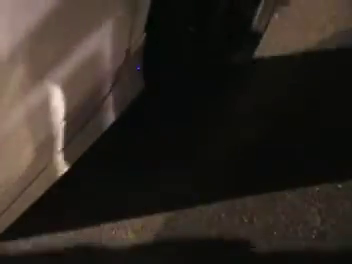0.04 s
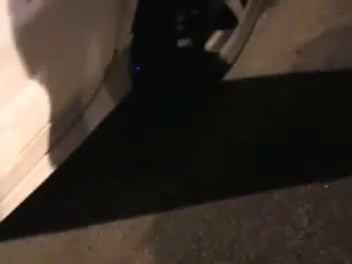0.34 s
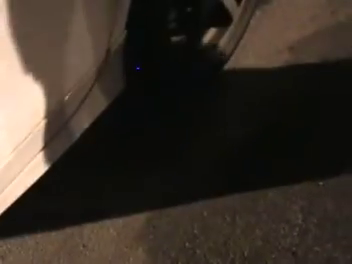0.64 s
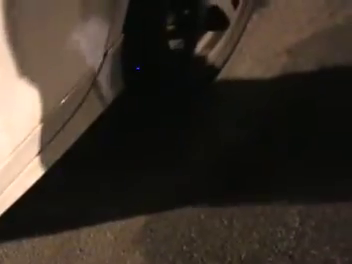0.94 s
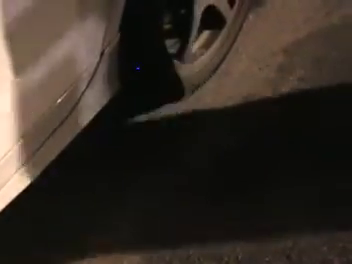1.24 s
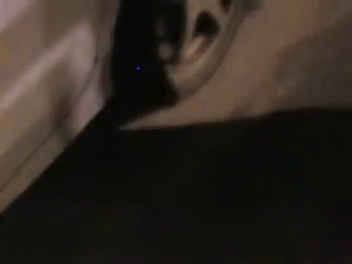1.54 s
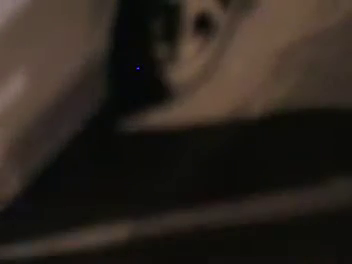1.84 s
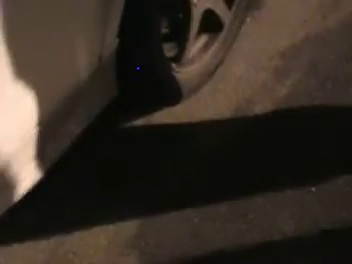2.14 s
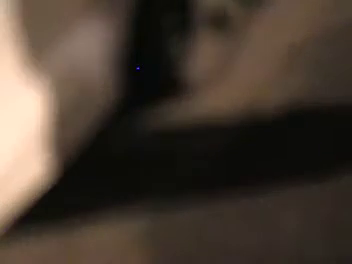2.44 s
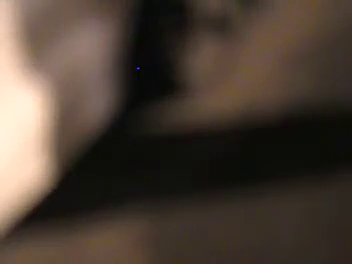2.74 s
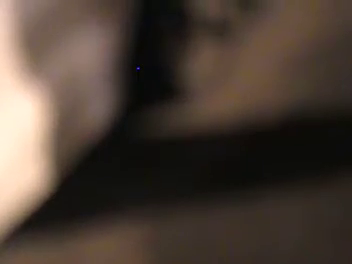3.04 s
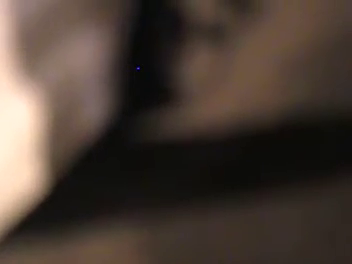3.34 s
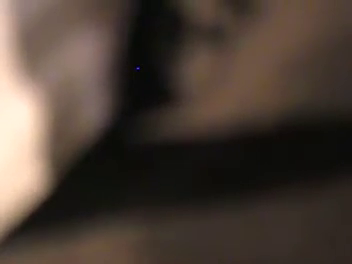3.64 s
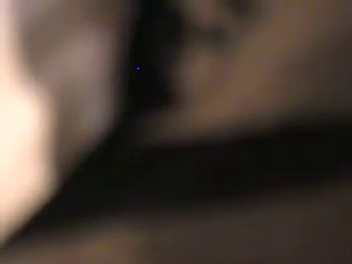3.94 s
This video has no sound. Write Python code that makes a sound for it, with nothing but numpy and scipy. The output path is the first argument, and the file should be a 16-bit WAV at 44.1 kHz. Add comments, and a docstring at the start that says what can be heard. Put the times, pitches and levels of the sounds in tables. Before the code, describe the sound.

A car exhaust drones down in pitch with a few pops and one loud backfire. The engine then revs twice with rushing gas, each climb ending in sharp, stuttering bangs, heard beside the rear wheel on a road.

```python
"""An exhaust drone sinks through the resonances of its pipe, with a few pops and one loud backfire.
It is a four-cylinder car standing on a road at night, the microphone beside the rear wheel.
Twice the throttle opens: the pitch climbs and gas rushes out of the tailpipe. At the rev limit
unburnt fuel explodes in the pipe, in stuttering bangs that overload the microphone."""
import sys
import numpy as np
from scipy import signal
from scipy.fft import rfft, irfft
from scipy.io import wavfile

SR = 44100
rng = np.random.default_rng(int(sys.argv[2]) if len(sys.argv) > 2 else 0)


def master_out(mix):
    """Clip the mix to full scale and print it as 16-bit PCM to the path in sys.argv[1]."""
    frames = np.transpose(np.atleast_2d(mix))
    ceiling = np.clip(frames, -1, 1)
    pcm = np.round(ceiling * 32767).astype(np.int16)
    wavfile.write(sys.argv[1], SR, pcm)


N = 176400
T = np.arange(N) / SR
HZ = np.fft.rfftfreq(N, 1 / SR)

# gas flow under throttle, dropping out whenever the fuel is cut (time [s], level [dB])
GAS_FLOW = [(1.66, -60), (1.73, -29.5), (1.85, -28), (1.95, -19.5), (2.1, -17), (2.25, -16), (2.29, -15.5),
            (2.302, -24.5), (2.355, -14.5), (2.39, -20.5), (2.403, -33), (2.45, -24), (2.5, -29.5),
            (2.56, -58), (3.19, -69), (3.22, -32), (3.25, -18.5), (3.4, -16.5), (3.48, -14.5),
            (3.52, -15.5), (3.545, -25), (3.6, -39), (3.628, -36), (3.638, -13.5), (3.68, -22),
            (3.74, -17.5), (3.78, -25), (3.88, -24.5), (3.92, -18.5), (3.935, -30), (3.953, -34),
            (3.96, -24), (3.99, -17.5)]


def amp(db):
    """Decibels to gain."""
    return 10 ** (np.asarray(db) / 20)


def unit(x):
    """Scales to an rms of one."""
    return x / np.sqrt(np.mean(abs(x) ** 2) + 1e-20)


def curve(table, column=1):
    """One column of a time table, at every sample."""
    rows = np.array(table)
    return np.interp(T, rows[:, 0], rows[:, column])


def response_db(points, hz=HZ):
    """Reads a spectrum table along a log-frequency axis."""
    f, db = np.transpose(points)
    return np.interp(np.log(hz + 1), np.log(f + 1), db)


def noise(db):
    """Unit noise with the given spectrum."""
    return unit(irfft(rfft(rng.standard_normal(N)) * amp(db), N))


def drift(hz):
    """Slow random motion up to the given rate."""
    coarse = rfft(rng.standard_normal(N // 100))
    slow = irfft(coarse / (1 + (HZ[:len(coarse)] / hz) ** 4))
    return unit(np.interp(T, np.linspace(0, T[-1], len(slow)), slow))


def add(mix, start, sound):
    """Mixes a sound in at a time in seconds."""
    part = mix[round(start * SR):][:len(sound)]
    part += sound[:len(part)]


def filtered(x, kind, hz):
    """A gentle Butterworth filter."""
    return signal.sosfilt(signal.butter(2, hz, kind, fs=SR, output="sos"), x)


def decay(t, t60):
    """Falls by 60 dB in t60 seconds."""
    return np.exp(-np.log(1000) * t / t60)


def ring(modes, t, wave=np.sin):
    """Struck resonances, each dying at its own rate."""
    return sum(amp(db) * decay(t, t60) * wave(2 * np.pi * hz * t) for hz, db, t60 in modes)


def tailpipe_db():
    """The narrow resonances that colour fast gas."""
    # tailpipe peaks (frequency [Hz], width [Hz], lift [dB])
    peaks = [(900, 130, 5), (1894, 70, 8.5), (2345, 75, 9), (2520, 53.4, 13), (2820, 180, 7),
             (3180, 27, 11), (3800, 240, 3.5), (4210, 110, 9), (4910, 80, 11.5), (5190, 270, 13),
             (6670, 290, 8), (9320, 140, 8.5)]
    return sum(db / (1 + (2 * (HZ - hz) / width) ** 2) for hz, width, db in peaks)


def puffs(phase, depth, flutter_db=0.78):
    """Gas leaves in one uneven puff per firing."""
    return unit((1 + depth * np.cos(phase)) * amp(flutter_db * drift(hz=90)))


def road_scatter(x, cutoff_hz=3560):
    """Short, dull echoes reach the microphone from the underbody and the asphalt."""
    tail = noise(-10 * np.log10(1 + (HZ / cutoff_hz) ** 2)) * decay(T, t60=.088) * (T > .003)
    return amp(-6.5) / 2 * signal.fftconvolve(x, tail / np.linalg.norm(tail))[:N]


def throttle_whistle():
    """A brief narrow hiss as the throttle first snaps open."""
    # the whistle (start [s], length [s], pitch [Hz], width [Hz], level [dB])
    whistle = (1.705, .05, 3880, 260, -30)
    start, length, hz, width, db = whistle
    swell = np.sin(np.pi * np.clip((T - start) / length, 0, 1))
    return amp(db) * swell * noise(-20 * np.log10(1 + (2 * (HZ - hz) / width) ** 2))


def tailpipe_rasp(phase):
    """Throaty turbulence and a thin hiss at the pipe mouth, present even off the throttle."""
    # strength of the turbulence (time [s], throat level [dB], hiss level [dB])
    levels = [(0, -23, -27.5), (.15, -25.5, -29), (.4, -28, -30.5), (.57, -26.5, -31.5), (.82, -29, -30),
              (.92, -35, -37.5), (.97, -55, -53), (1.09, -43, -47.5), (1.2, -46.5, -51.5), (1.35, -44, -47),
              (1.5, -40.5, -43), (1.68, -33.5, -38), (1.76, -28.5, -31), (1.9, -26.5, -37),
              (2.2, -30.5, -24.5), (2.5, -30.5, -33), (2.7, -28, -28.5), (2.95, -23.5, -26.5),
              (3.1, -25.5, -30.5), (3.18, -28.5, -28.5), (3.3, -22.5, -31), (3.6, -35.5, -38),
              (4, -28.5, -40)]
    # spectrum of the throat (frequency [Hz], level [dB])
    throat_colour = [(20, 4), (65, -21.5), (150, -2), (220, -3), (290, 1.5), (390, 2.5), (470, -11),
                     (620, -4.5), (730, -3), (950, -3), (1150, -5), (1500, -6), (2000, -10), (3000, -21),
                     (5000, -40), (13000, -58)]
    # spectrum of the hiss (frequency [Hz], level [dB])
    hiss_colour = [(500, -13), (1500, -3), (2800, -1), (4200, -4), (5100, -6), (5700, -5.5), (8000, -5.5),
                   (10300, -4), (12500, -8)]
    since_spit = (phase / (8 * np.pi) + .5) % 1  # one cylinder spits in each cycle of four firings
    lope = unit(1 + 0.37 * np.exp(-since_spit / 0.11))
    throat = noise(response_db(throat_colour)) * amp(curve(levels)) * puffs(phase, depth=0.2)
    hiss = noise(response_db(hiss_colour)) * amp(curve(levels, column=2)) * puffs(phase, depth=0.067)
    return throat * lope + hiss


def firing_bark(phase, muffler_band_hz=(675, 1067), puff_s=.0012):
    """Each firing strikes the pipe with a pulse and a short turbulent puff; unequal cylinders lope."""
    # strength of the bark (time [s], level [dB])
    levels = [(0, -27), (.08, -26), (.14, -21.5), (.19, -37), (.28, -23.5), (.39, -25), (.46, -21),
              (.6, -33), (.69, -26.5), (.78, -28), (.87, -23), (.91, -47), (.97, -40.5), (1.2, -46),
              (1.35, -42), (1.49, -33), (1.62, -39), (1.718, -40), (1.73, -21), (1.82, -19), (1.9, -27.5),
              (2.0, -23.5), (2.25, -35), (2.5, -47), (2.7, -47), (2.87, -30), (3.09, -24), (3.16, -44),
              (3.3, -26), (3.6, -40), (4, -56)]
    # pipe modes that a firing strikes (frequency [Hz], level [dB], t60 [s])
    modes = [(724.4, -5, 0.13), (859, -3, 0.027), (931, 0, 0.051), (1066, -6.5, .035), (880, -1, 0.01),
             (1340, 1, 0.029), (1830, 8, 0.029)]
    # the four cylinders in firing order (level [dB])
    cylinder_db = [-4.5, -0.5, 0, -6]
    firing = np.floor(phase / (2 * np.pi) + 0.204).astype(int)
    onsets = np.flatnonzero(np.diff(firing))
    scatter_db = 1.3 * rng.standard_normal(N)[:len(onsets)]
    pulses = np.zeros(N)
    pulses[onsets] = amp(np.array(cylinder_db)[firing[onsets] % 4] + scatter_db)
    pipe = filtered(ring(modes, T[:SR // 5], np.cos), "bandpass", muffler_band_hz)
    puff = signal.lfilter([1], [1, -np.exp(-1 / (puff_s * SR))], pulses) * rng.standard_normal(N)
    return unit(signal.fftconvolve(pulses + .07 * puff, pipe)[:N]) * amp(curve(levels))


def gas_rush(phase):
    """Bright pulsing flow through the tailpipe under full throttle."""
    # spectrum of the flow (frequency [Hz], level [dB])
    colour = [(20, -35), (100, -30), (300, 6.5), (600, -8.5), (780, -14), (950, 7.5), (1250, 3.5),
              (1550, -3), (2500, -2.5), (3300, -1.5), (4500, -9.5), (6000, -14), (8000, -7), (9500, -4),
              (11000, -2.5), (12500, -9.5)]
    return noise(response_db(colour) + tailpipe_db()) * amp(curve(GAS_FLOW)) * puffs(phase, depth=0.16)


def exhaust_drone(firing_hz, phase):
    """Three strong harmonics of the firing rate, and rough overtones, sweep the pipe's resonances."""
    # firing tone as it passes through the low resonances (time [s], level [dB])
    fundamental = [(0.0, -11), (0.14, -14), (0.27, -11.5), (0.39, -11.5), (0.49, -21), (0.92, -21),
                   (0.98, -43), (1.1, -35), (1.16, -45.5), (1.57, -32), (1.67, -35), (1.78, -24.5),
                   (2.14, -19.5), (2.47, -32.5), (2.57, -26), (2.84, -14.5), (3.02, -10), (3.16, -10.5),
                   (3.22, -21.5), (3.39, -16.5), (3.55, -27.5), (3.61, -29.5), (3.76, -26), (4.0, -28)]
    # its octave (time [s], level [dB])
    octave = [(0.0, -25), (0.18, -27), (0.53, -12), (0.71, -23), (0.86, -25.5), (1.02, -45), (1.35, -48),
              (1.63, -27), (1.73, -13.5), (1.84, -24.5), (2.08, -13.5), (2.18, -31.5), (2.41, -31.5),
              (2.51, -52), (2.59, -27.5), (2.86, -18.5), (2.96, -19), (3.16, -36), (3.2, -25.5),
              (3.29, -16), (3.47, -43), (3.59, -42), (3.65, -60), (4.0, -41)]
    # its twelfth (time [s], level [dB])
    twelfth = [(0.0, -28), (0.1, -50), (0.39, -32), (0.67, -15.5), (0.92, -23.5), (1.16, -49.5),
               (1.53, -12), (1.65, -28), (1.78, -13.5), (1.88, -24), (1.98, -59), (2.1, -30), (2.16, -41),
               (2.35, -34), (2.73, -39.5), (3.29, -27.5), (3.47, -40), (4.0, -45)]
    # drive of the rough overtones around them (time [s], level [dB])
    roughness = [(0, -20), (.15, -9.5), (.3, -17.5), (.55, -15.5), (.8, -17), (.93, -16), (.96, -37),
                 (1.16, -39), (1.3, -31.5), (1.48, -28.5), (1.66, -22.5), (1.76, -25), (2.05, -18),
                 (2.28, -37), (2.5, -22), (2.66, -19), (3.1, -14), (3.18, -17.5), (3.3, -25), (3.48, -35),
                 (3.6, -25), (4, -21)]
    # response of the exhaust pipe (frequency [Hz], gain [dB])
    pipe = [(30, -50), (80, -13), (120, -13), (160, 5.5), (225, -12.5), (280, 8.5), (330, -8.5),
            (400, -4.5), (460, -20.5), (530, -16.5), (620, -21), (720, -11.5), (800, -23.5), (1500, -50)]
    strong = {1: fundamental, 2: octave, 3: twelfth}
    load = np.clip(amp(curve(GAS_FLOW) + 32), 0, 1)
    hot_stretch = 1 + 0.058 * load  # hot gas raises the resonances
    drone = np.zeros(N)
    for order in np.arange(2, 29) / 4:
        if order in strong:
            level_db = curve(strong[order])
        else:
            # unequal cylinders add half and quarter orders, weaker towards the bass
            uneven_db = -21 if order % .5 == 0 else -28
            order_db = 0 if order % 1 == 0 else min(uneven_db + 8 * np.log2(order), 0)
            level_db = curve(roughness) + order_db + response_db(pipe, order * firing_hz / hot_stretch)
        shake = .06 + .035 * order
        gain = amp(level_db) * (1 + shake * drift(hz=35))
        drone += gain * np.cos(order * phase + shake * drift(hz=35) + 2 * np.pi * rng.random())
    return drone


def backfires(jet_rise_s=0.0017, outlet_hz=159):
    """Unburnt fuel explodes in the pipe: a ringing blast, then a short jet of gas."""
    # explosions (time [s], blast level [dB], jet level [dB], jet length [s])
    bangs = [(.2805, -12, -38, .004), (.3068, -13, -43, .004), (.3333, -18, -40, .004),
             (.3595, -16, -40, 0.003), (.8472, -8, -43, 0.0064), (0.9241, -10, -25, 0.0084),
             (0.931, -4, -12.5, 0.0036), (1.1034, 3.5, -22, 0.014), (2.3045, -9, -3, 0.0098),
             (2.3253, 3, -7, 0.0087), (2.4079, 5, -2.5, 0.0098), (2.4279, -3.5, -5.5, 0.014),
             (3.0695, -22, -38, .005), (3.0928, -17, -44, .005), (3.512, -2.5, -13, .013),
             (3.5307, -1.5, -19, 0.006), (3.5496, 1, -7.5, 0.005), (3.575, 1, -11, 0.0045),
             (3.6929, 0, -6, 0.0027), (3.7122, 0.5, -12, 0.0048), (3.728, -25, -31, 0.0046),
             (3.7851, -0.5, -6, 0.0028), (3.8048, -4.5, -8.5, .011), (3.824, 4, -13.5, .014),
             (3.8487, -5.5, -9.5, 0.0072), (3.8698, -4, -11, .013), (3.958, -9.5, -12.5, 0.0069),
             (3.9758, -5.5, -11, 0.021)]
    # modes that each blast strikes (frequency [Hz], level [dB], t60 [s])
    blast_modes = [(1083, 0.5, 0.0081), (963, -15.5, 0.038), (1280, -15, 0.018), (270, -12.5, 0.023),
                   (702.2, -25.5, 0.025), (525, -23, 0.066), (1800, -19.5, 0.032), (2616, -18.5, 0.028)]
    # faint metal ring that lingers afterwards (frequency [Hz], level [dB], t60 [s])
    metal_modes = [(1048, -39, .7), (2099, -56, .7), (3176, -54, .55)]
    # spectrum of the jet (frequency [Hz], level [dB])
    jet_colour = [(20, -21), (100, -10), (250, 0.5), (550, -6.5), (950, 3.5), (1500, -2), (2700, 0.5),
                  (4000, -3.5), (6000, -5), (8000, -3), (10000, 2.5), (12500, -4.5)]
    t = T[:SR // 5]
    blasts, jets = np.zeros(N), np.zeros(N)
    metal = ring(metal_modes, T[:SR])
    gas = noise(response_db(jet_colour) + .4 * tailpipe_db())
    for start, blast_db, jet_db, length in bangs:
        detuned = [(hz * (1 + rng.uniform(-.12, .12)), db, t60) for hz, db, t60 in blast_modes]
        add(blasts, start, amp(blast_db) * ring(detuned, t))
        add(blasts, start, amp(blast_db) * metal)
        jet_shape = np.minimum(t / jet_rise_s, 1) * decay(np.maximum(t - length, 0), t60=0.025)
        add(jets, start, amp(jet_db) * jet_shape)
    return filtered(blasts + jets * gas, "highpass", outlet_hz)  # the narrow mouth radiates little bass


def scene():
    """Beside the rear wheel, in mono: engine speed paces the drone and gas noise; the bangs break in."""
    # engine speed (time [s], firing rate [Hz])
    speed = [(0, 174.7), (.15, 159.3), (.5, 141.1), (.75, 126.5), (1, 112.7), (1.25, 99.9), (1.5, 89.7),
             (1.69, 82.86), (1.76, 90), (1.85, 106.2), (2, 138.9), (2.15, 179.6), (2.27, 208.4),
             (2.4, 207.3), (2.55, 198.8), (2.75, 182.1), (3, 164.8), (3.2, 155.4), (3.3, 168.8),
             (3.48, 209.2), (3.6, 202.6), (4, 207.8)]
    firing_hz = curve(speed) * (1 + .002 * drift(hz=13.2))
    phase = 2 * np.pi * np.cumsum(firing_hz) / SR
    engine = exhaust_drone(firing_hz, phase) + firing_bark(phase)
    gas = tailpipe_rasp(phase) + gas_rush(phase) + throttle_whistle()
    bangs = backfires()
    return (engine + gas + bangs + road_scatter(bangs))[None]


def record(dry, low_cut_hz=63, top_hz=12700, knee=10):
    """The close microphone sheds the deep bass, overloads on the bangs and loses the highest treble."""
    thin = filtered(dry, "highpass", low_cut_hz)
    clipped = thin / (1 + abs(thin) ** knee) ** (1 / knee)
    band_limit = signal.firwin(401, top_hz, window=("kaiser", 8), fs=SR)
    return signal.oaconvolve(clipped, band_limit[None], "same")


dry = scene()
out = record(dry)
master_out(out)
```